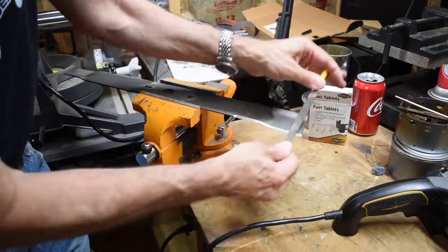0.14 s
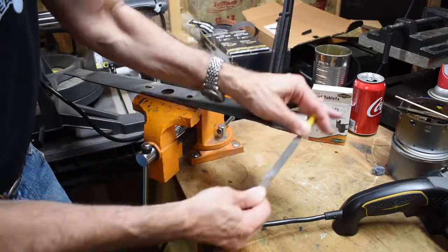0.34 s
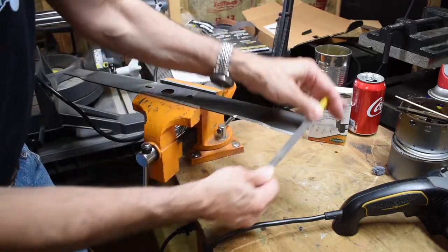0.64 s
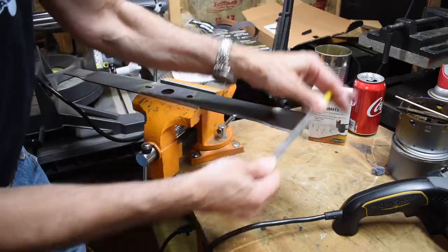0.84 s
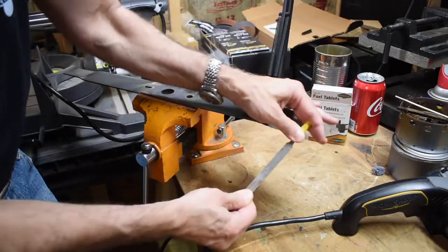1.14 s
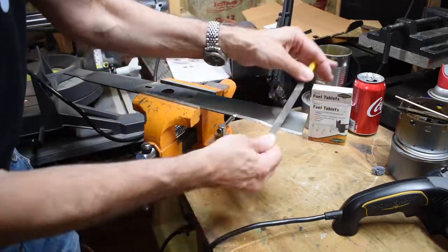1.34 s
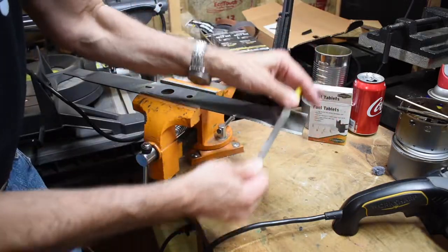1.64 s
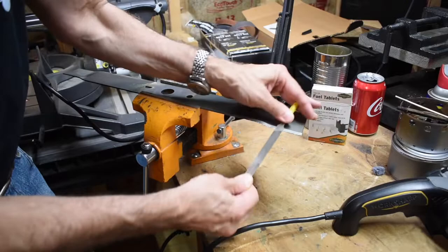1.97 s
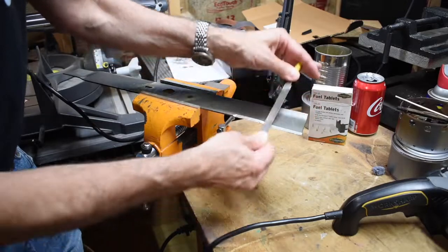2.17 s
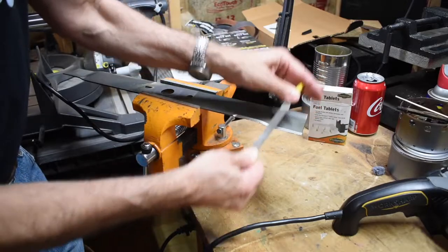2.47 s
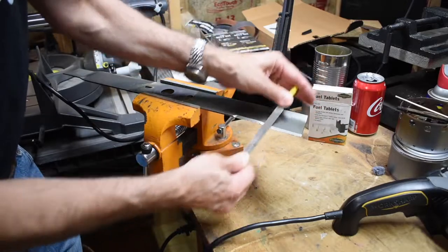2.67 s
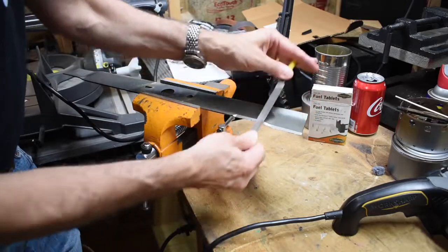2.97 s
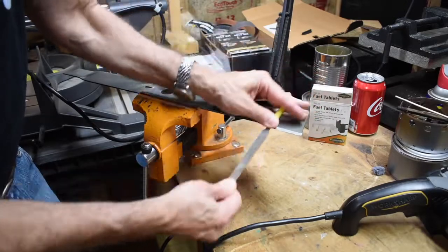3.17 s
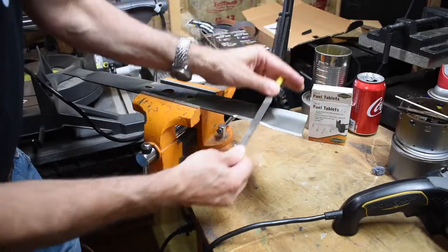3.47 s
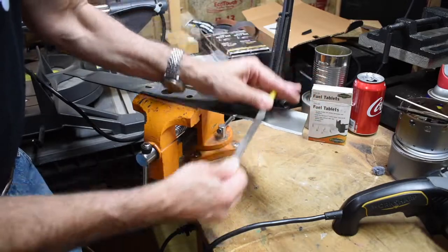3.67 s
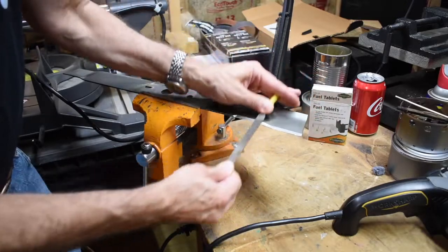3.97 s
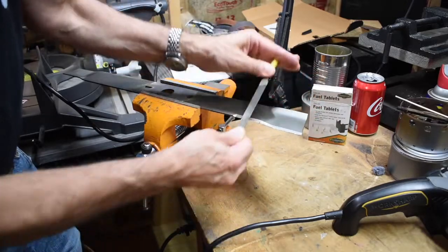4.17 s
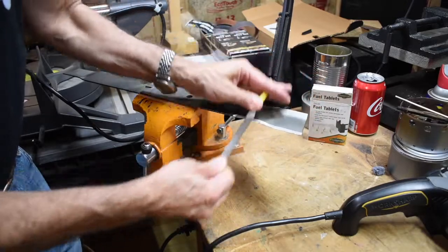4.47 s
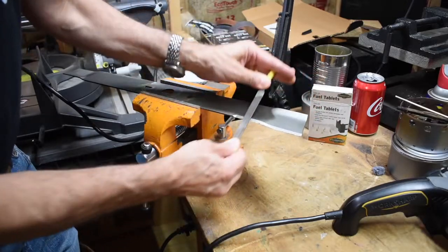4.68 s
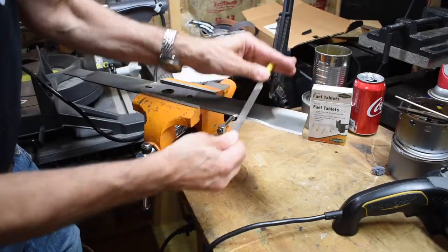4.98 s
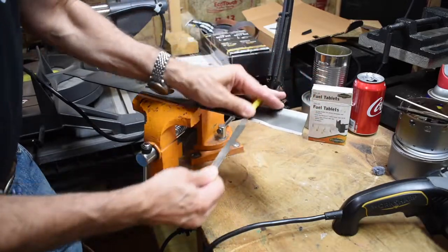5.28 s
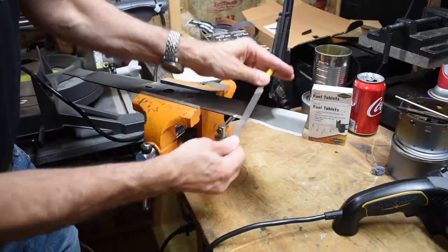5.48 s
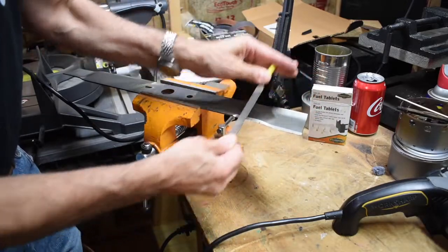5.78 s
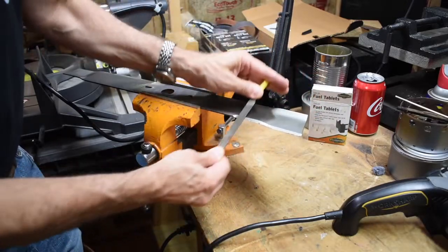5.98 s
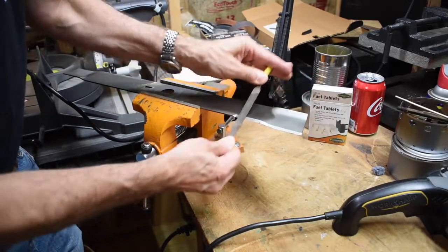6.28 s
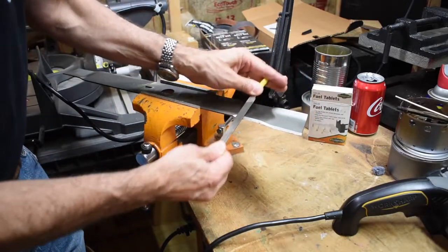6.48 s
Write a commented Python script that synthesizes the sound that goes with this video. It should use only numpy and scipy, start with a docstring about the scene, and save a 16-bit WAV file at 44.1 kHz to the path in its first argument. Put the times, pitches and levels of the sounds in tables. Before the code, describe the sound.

Rhythmic metal filing in a small workshop, with clacks and bright scrapes that grow softer over a faint hum.

```python
"""A hand file sharpens a steel mower blade held in a bench vise, in a small cluttered workshop.
Each push lands with a clack, rasps across the edge and lifts off, working from the tip towards the vise.
The file's teeth make the blade ring, and now and then they catch on one of its tones and squeal.
The bench rumbles with each push, over soft air noise and the low hum of a motor on mains power."""
import sys
import numpy as np
from scipy import signal
from scipy.fft import rfft, irfft, next_fast_len
from scipy.io import wavfile
from scipy.ndimage import uniform_filter1d

SR = 44100
rng = np.random.default_rng(int(sys.argv[2]) if len(sys.argv) > 2 else 0)


def file_out(sig):
    """Save sig as 16-bit WAV at sys.argv[1]."""
    # one column per channel
    cols = np.atleast_2d(sig).T
    # limit, then scale
    lim = np.clip(cols, -1, 1)
    pcm = np.round(lim * 32767).astype(np.int16)
    wavfile.write(sys.argv[1], SR, pcm)


N = 291942
TIME = np.arange(N) / SR
RING_TIME = TIME[:8192]  # time axis for the ringing after one tap
LIFT_S = 0.052  # the file takes this long to leave the edge after a push

# Pushes of the file: (start [s], build-up [s], length [s], relative level [dB], rise from start
# to end [dB], swell midway [dB], extra for the lows [dB], extra for the hiss [dB])
PUSHES = [ (0.226, 0.0028, .128, -14, -2.5, -0.5, -9.5, -4),
          (0.632, 0.0077, 0.13, -17, 5.5, 5.5, -6.5, -3.5), (1.058, 0.018, 0.1, -16, -3, -5.5, -8.5, -3.5),
          (1.451, 0.032, 0.15, -17.5, 1.5, 3, -8.5, -2.5), (1.863, 0.03, 0.16, -17, -3, -1.5, -6.5, -4),
          (2.282, 0.04, .180, -19, -16, 2.5, -4.5, -4), (2.687, 0.0045, 0.13, -19.5, 5.5, -3.5, -6.5, -4),
          (3.092, 0.0067, .148, -23, -0.5, 0, -3.5, -2.5), (3.522, 0.0036, 0.15, -24.5, -8, -2, -2.5, -3.5),
          (3.917, .016, 0.16, -26, 0, 2.5, -1.5, -5), (4.330, 0.0049, 0.14, -23.5, -0.5, 2, -3.5, -4),
          (4.728, 0.0047, .162, -25, -1, -4, -2.5, -4.5), (5.143, 0.0039, 0.16, -25.5, 1, -1.5, -2, -4.5),
          (5.551, .010, 0.14, -24, 4.5, 3, -3.5, -3.5), (5.961, .004, 0.17, -24, -7, 3.5, -1.5, -4),
          (6.381, 0.035, 0.063, -24.5, 0, 2.5, 1, -9), (6.538, 0.0035, 0.073, -24.5, 4.5, 5, -9, -2.5), ]
# The file's own tones, damped by the fingers: (pitch [Hz], width [Hz], relative level [dB])
FILE_TONES = [(2286, 25, 10), (2595, 66, 8), (2875, 44, 1.5), (3210, 88, 7), (3627, 81, 9), (6690, 76, 8.5),
              (6940, 240, -1), (8330, 130, 5), (11360, 66, -2.5), (12740, 70, -12.5)]


def rasp(gain_db=1.92, file_db=-4, end_speed=0.3, ring_s=0.055):
    """Each push drives the teeth into the blade; the hand slows towards the end of its reach."""
    speeds = []
    for start, _, length_s, *_ in PUSHES:
        speeds += [(start, 1), (start + length_s + LIFT_S, end_speed)]
    force = teeth(np.interp(TIME, *np.transpose(speeds)))
    out = np.zeros(N + len(RING_TIME))
    for start, attack_s, length_s, db, rise_db, swell_db, body_db, hiss_db in PUSHES:
        t = TIME - start + 0.0026  # the force comes just ahead of the ring it builds
        touching = np.flatnonzero((t >= 0) & (t < length_s + LIFT_S))
        press_db = hand_pressure(t[touching], attack_s, length_s, rise_db, swell_db)
        # the rasp gets thinner and brighter as the push goes on
        past_middle = np.minimum(t[touching] / length_s, 1) - 0.5
        low_db = body_db + press_db - 3.5 * past_middle
        high_db = hiss_db + 1.08 * press_db + 5 * past_middle
        tones = blade(start + length_s / 2) + undb(file_db) * ring(FILE_TONES)
        low, _, _ = three_bands(steel(ring_s, snap=2.1) + tones)
        _, middle, high = three_bands(steel(ring_s) + tones)
        for band_db, response in ((low_db, low), (press_db, middle), (high_db, high)):
            sound = signal.fftconvolve(force[touching] * undb(db + band_db), response)
            out[touching[0]:touching[0] + len(sound)] += sound
    return undb(gain_db) * out[:N]


def teeth(speed, rows_per_s=2800, chips_per_s=5000, bite_s=0.0066):
    """The cutting force: rows of teeth tick over the edge at the hand's speed, and tiny chips tear off."""
    # Moments when the teeth dig in deeper: (time [s], extra level [dB])
    bites = [(0.269, 5.5), (0.339, 5.5), (.658, 6), (0.769, 5), (1.148, 4), (1.893, 4), (2.793, 4),
             (3.228, 4), (3.64, 6), (4.44, 5)]
    row_rate = rows_per_s * speed * (1 + 0.1 * wander(90))
    rows_passed = np.floor(np.cumsum(row_rate / SR))
    ticks = np.diff(rows_passed, prepend=0) * undb(3 * rng.standard_normal(N))
    ticks = band_filter(ticks, 2, 250, "highpass")
    chip_sizes = undb(3.5 * np.minimum(rng.exponential(size=N), 4.6))  # a tooth can only cut so much
    chips = (rng.random(N) < chips_per_s / SR) * rng.choice([-1, 1], N) * chip_sizes
    cutting = unit(0.6 * unit(ticks) + unit(chips))
    bite_db = sum(db * bump(TIME - when, bite_s) for when, db in bites)
    return cutting * undb(1.44 * wander(170) + bite_db)


def hand_pressure(t, attack_s, length_s, rise_db, swell_db, skim_db=-16, release_db_per_s=536):
    """Pressure in dB, t seconds into a push: the hand skims at first, bears down, then eases off."""
    progress = np.clip(t / length_s, 0, 1)
    attack = skim_db * np.clip(1 - t / attack_s, 0, 1)
    arch = 4 * progress * (1 - progress) - 2 / 3
    hold = rise_db * (progress - 0.5) + swell_db * arch
    release = -release_db_per_s * np.maximum(t - length_s, 0)
    return attack + hold + release


def clacks(gain_db=21, blade_db=-7, skid_s=0.012, ring_s=0.078, tick_s=0.016):
    """Steel meets steel: a knock and a short skid of the teeth ring file and blade together."""
    # The file lands on or catches the edge: (time [s], relative level [dB], extra treble [dB])
    knocks = [(0.1965, -10, 3), (0.226, -16, -19), (0.3267, -7.5, -0.5), (0.6081, -10, 0.5),
              (0.6387, -7.5, -3.5), (0.8038, -19.5, 0), (1.0511, -12.5, 2.5), (1.4376, -10.5, 3),
              (1.8568, -17, 6), (2.2725, -10, 1.5), (2.6776, -7, -3), (3.0808, -9.5, -4), (3.5114, -8, 3),
              (3.908, -10.5, -1), (4.3208, -7.5, 0), (4.7211, -14, 1), (5.1365, -10.5, -3), (5.154, -29, 0),
              (5.5445, -10, 1.5), (5.9528, -11, -1.5), (6.3644, -14, 0), (6.4053, -22, -3),
              (6.4129, -17, -0.5), (6.4296, -11, -3.5), (6.4397, -18.5, -0.5), (6.5314, -14.5, -5)]
    out = np.zeros(N + len(RING_TIME))
    for when, db, treble_db in knocks:
        blow = dying_noise(RING_TIME, skid_s)
        blow[0] += 1  # the knock ahead of the skid
        dense_ring = steel(ring_s)
        response = dense_ring + ring(FILE_TONES) + undb(blade_db) * blade(when)
        sound = signal.fftconvolve(blow, response)[:len(blow)]
        thud, _, _ = three_bands(dense_ring)
        thud_db = -24 + 0.21 * db  # a harder knock adds only a little thud
        # the light, hard file barely stirs the low tones
        _, clang, _ = three_bands(band_filter(sound, 2, 1350, "highpass"))
        # the highest tones are struck hardest and die first
        onset = sound * np.exp(-RING_TIME / tick_s)
        _, _, tick = three_bands(colour(onset, [(7000, 0.007), (12000, 4)]))
        start = int(when * SR)
        out[start:start + len(blow)] += undb(thud_db) * thud + undb(db) * (clang + undb(treble_db) * tick)
    return undb(gain_db) * out[:N]


def chatter(gain_db=4, waver=0.014):
    """The teeth lock onto one tone of the blade for a moment: a gritty squeal swells and dies."""
    # Squeals: (time of the peak [s], pitch [Hz], relative level [dB], half length [s])
    squeals = [(.313, 2220, -12.5, .0085), (0.343, 1351, -8.5, .007), (0.355, 867, -20, 0.0074),
               (0.693, 1404, -14.5, 0.0079), (.711, 871, -16, .011), (0.732, 3600, -16.5, .005),
               (1.157, 1365, -13, 0.01), (1.498, 2790, -19, 0.0068), (1.512, 2190, -17, 0.0047),
               (1.963, 863, -16.5, .013), (3.205, 2200, -18.5, .008), (3.239, 3600, -20, 0.0067),
               (3.549, 853, -21.5, 0.0086), (5.253, 2200, -24.5, .018), (5.64, 2474, -20, 0.0068),
               (6.607, 2227, -22, 0.012)]
    drift = waver * wander(300)
    roughness = undb(1.5 * wander(400))
    out = np.zeros(N)
    for when, hz, db, half_s in squeals:
        sounding = np.abs(TIME - when) < 4 * half_s
        swell = bump(TIME[sounding] - when, half_s)
        phase = 2 * np.pi * np.cumsum(hz * (1 + drift[sounding])) / SR
        out[sounding] += undb(db) * swell * np.sin(phase)
    return undb(gain_db) * out * roughness


def blade(when):
    """The blade's ring after a tap; how strong each tone is depends on where the file touches."""
    # The file's path: (time [s], place [0 at the tip, 1 midway, 2 or more near the vise])
    path = [(1.15, 0.08), (1.5, 1), (2.8, 1.33), (3.6, 1.8), (6.5, 2.05)]
    # The blade's tones: (pitch [Hz], width [Hz], level filed at the tip [dB], midway [dB], by the vise [dB])
    blade_tones = [(335.5, 48, 9, -11.5, 11.5), (394, 22, 1, 0.5, 5.5), (572.9, 12.7, 10.5, 16, 20),
                   (869, 18.7, 23, 24.5, 23), (1133, 58, 13, -3, 9), (1389, 5.7, 5, -5, 8.5),
                   (1355, 45, 14, 15, 7.5), (1564, 67, -3.5, 1.5, 9), (2217, 19, 8.5, 10.5, 15.5),
                   (2202, 46.5, 15, 14.5, 17), (2456, 68, -13, -10, 12.5), (2755, 170, -10, 2.5, 4),
                   (3236, 32.5, 8.5, 17, 11), (3455, 41, 12, 8, 11), (3680, 43, -2.5, 10.5, -2),
                   (3990, 220, -9, 11, -3.5), (4820, 27, 18.5, 22.5, 18.5), (5000, 18, -8, -1, 18.5),
                   (5840, 11, 9, -2, -13), (6070, 40, 1, 18.5, -3), (6150, 27, 6, 4, 8),
                   (7250, 150, -6, -9, 10.5), (7790, 99, 9, 11.5, 5.5), (11260, 370, -6, -7, 0),
                   (12300, 330, -20, -18, -5.5)]
    place = np.interp(when, *np.transpose(path))
    return ring([(hz, width, np.interp(place, [0, 1, 2], dbs)) for hz, width, *dbs in blade_tones])


def steel(ring_s, snap=0.51):
    """The first snap of a contact and the dense ring behind it, new for every point of contact."""
    # Ring of blade, file and vise between their clear tones: (frequency [Hz], relative level [dB])
    steel_colour = [(90, -3), (200, -17), (290, -4), (400, -2), (500, 5), (660, -30.5), (1000, -6.5),
                    (1450, -3.5), (1850, -14), (2450, -7), (3000, -8.5), (3850, -1), (4700, 7.5), (7700, 2),
                    (11500, -7.5), (15500, -20)]
    response = dying_noise(RING_TIME, ring_s)
    response[0] += snap
    return colour(response / np.hypot(1, snap), steel_colour)


def ring(tones):
    """Tapped metal rings with (pitch, width, level) tones; the wider a tone, the sooner it dies."""
    out = np.zeros(len(RING_TIME))
    for hz, width, db in tones:
        strength = undb(db) * 2 * np.pi * width / SR
        fade = np.exp(-np.pi * width * RING_TIME)
        out += strength * fade * np.cos(2 * np.pi * hz * RING_TIME + rng.uniform(0, 2 * np.pi))
    return out


def bench(level_db=-45, pitch_hz=64, swell_s=0.068):
    """The vise passes each push on to the bench, which gives a low rumble."""
    middles = [start + (length_s + LIFT_S) / 2 for start, _, length_s, *_ in PUSHES]
    effort = sum(bump(TIME - middle, swell_s) for middle in middles)
    rumble = band_filter(rng.standard_normal(N), 3, [0.69 * pitch_hz, 1.7 * pitch_hz], "bandpass")
    return undb(level_db) * effort * unit(rumble)


def workshop(sound, echo_db=-19, echo_s=0.21):
    """The cluttered room adds only a short, dull echo to a sound."""
    echo = dying_noise(TIME[:SR // 2], echo_s)
    echo = colour(echo, [(300, 16.5), (1500, -8.5), (5000, 1.5), (14000, -18.5)])
    return sound + undb(echo_db) * signal.oaconvolve(sound, echo)[:N]


def room_air(level_db=-45.5):
    """The air in the workshop makes a soft, nearly steady noise."""
    # Tone colour of the air: (frequency [Hz], relative level [dB])
    air_colour = [(25, -23.5), (42, -6.5), (58, -13), (85, -10.5), (170, -3), (240, -12), (400, -15),
                  (1000, -15), (2000, -23), (3500, -21.5), (6400, -33), (16000, -43.5)]
    noise = unit(colour(rng.standard_normal(N), air_colour))
    return noise * undb(level_db + 1.06 * wander(7.5))


def motor_hum(waver_db=4):
    """A motor on mains power hums, wavering in pitch and loudness."""
    # Tones of the hum: (pitch [Hz], typical rms level [dB])
    hum_tones = [(58.5, -50.5), (170, -56.5)]
    drifting_time = np.cumsum(1 + 0.0246 * wander(9.3)) / SR
    out = np.zeros(N)
    for hz, db in hum_tones:
        strength = np.sqrt(2) * undb(db + waver_db * wander(7.9))
        out += strength * np.sin(2 * np.pi * hz * drifting_time)
    return out


def undb(db):
    """Turn decibels into a number to multiply by."""
    return 10 ** (np.asarray(db) / 20)


def unit(x):
    """Scale a signal so that its average strength (rms) is 1."""
    return x / np.sqrt(np.mean(x ** 2))


def wander(rate):
    """A smooth random wobble of strength 1 that heads for a new value `rate` times a second."""
    step = max(int(SR / rate), 2)
    stairs = np.repeat(rng.standard_normal(N // step + 1), step)
    return unit(uniform_filter1d(stairs, step)[:N])


def bump(t, half_s):
    """A bell-shaped rise and fall that peaks at t = 0."""
    return np.exp(-(t / half_s).clip(-8, 8) ** 2 / 2)


def dying_noise(t, fade_s):
    """Countless overlapping tones: noise of energy 1 that falls by 60 dB in fade_s."""
    noise = rng.standard_normal(len(t)) * np.exp(-np.log(1000) * t / fade_s)
    return noise / np.linalg.norm(noise)


def band_filter(x, order, hz, kind):
    """Keep the lows, the highs or a band between; a higher order cuts more steeply."""
    return signal.sosfilt(signal.butter(order, hz, kind, fs=SR, output="sos"), x)


def three_bands(x, low_hz=1000, high_hz=4500):
    """Split a sound into lows, middle and highs, each scaled to energy 1."""
    bands = ((low_hz, "lowpass"), ((low_hz, high_hz), "bandpass"), (high_hz, "highpass"))
    parts = [band_filter(x, 6, hz, kind) for hz, kind in bands]
    return [part / np.linalg.norm(part) for part in parts]


def colour(x, points):
    """Shape a sound's tone along a curve of (frequency [Hz], level [dB]) points."""
    hz, db = np.transpose(points)
    size = 2 * next_fast_len(len(x))
    grid_hz = np.maximum(np.fft.rfftfreq(size, 1 / SR), 1)
    gains = undb(np.interp(np.log(grid_hz), np.log(hz), db))
    # fold the filter forward in time, so that nothing rings before it is struck
    cepstrum = irfft(np.log(gains))
    cepstrum[1:size // 2] *= 2
    cepstrum[size // 2 + 1:] = 0
    return irfft(rfft(x, size) * np.exp(rfft(cepstrum)))[:len(x)]


def scene():
    """The filing in its room, with bench, air and hum, in one channel."""
    filing = rasp() + clacks() + chatter()
    filing = band_filter(filing, 2, 90, "highpass")  # a slim blade cannot give off deep bass
    return (workshop(filing) + bench() + room_air() + motor_hum())[None]


def record(dry, top_hz=15900):
    """Clip the loudest peaks and cut the highest treble."""
    treble_cut = signal.ellip(8, 0.2, 60, top_hz, fs=SR, output="sos")
    return signal.sosfilt(treble_cut, np.clip(dry, -1, 1))


dry = scene()
out = record(dry)
file_out(out)
```